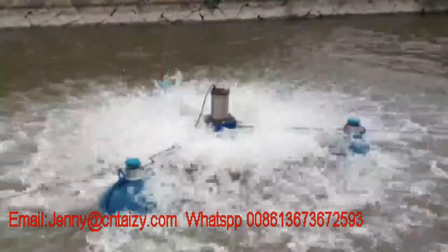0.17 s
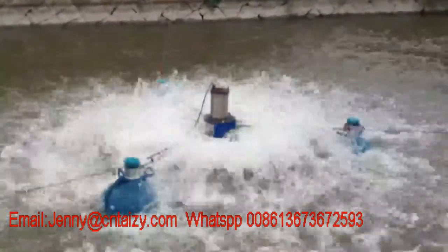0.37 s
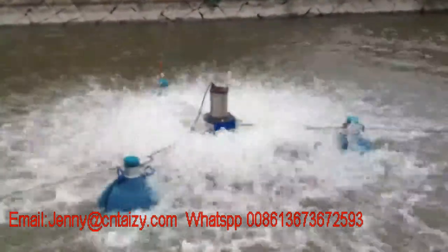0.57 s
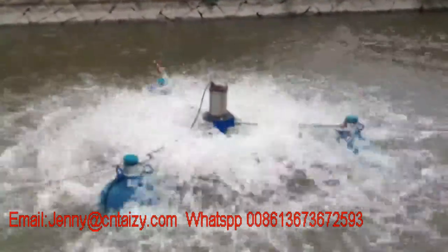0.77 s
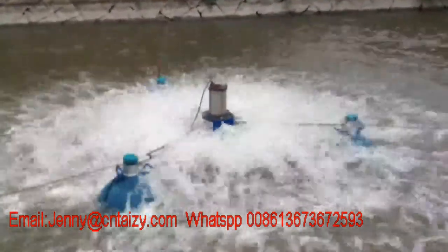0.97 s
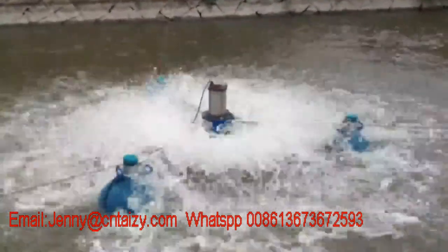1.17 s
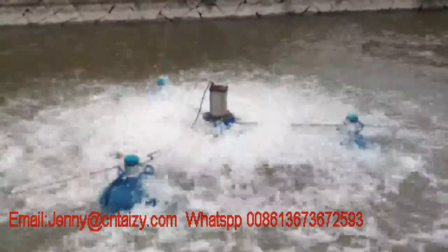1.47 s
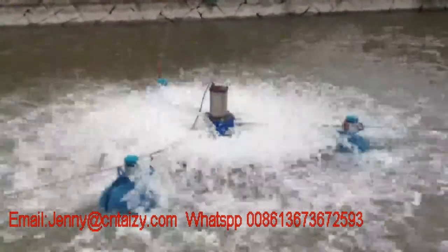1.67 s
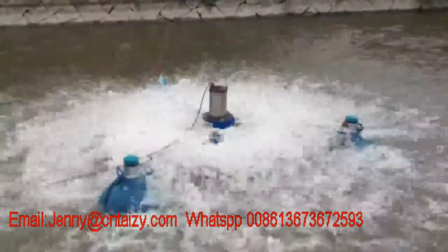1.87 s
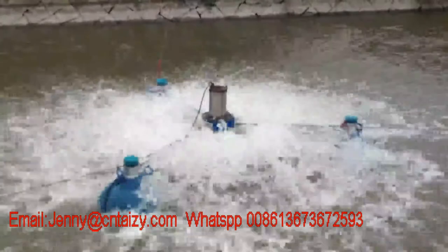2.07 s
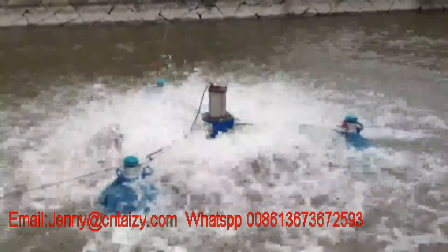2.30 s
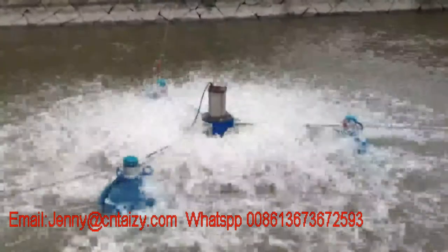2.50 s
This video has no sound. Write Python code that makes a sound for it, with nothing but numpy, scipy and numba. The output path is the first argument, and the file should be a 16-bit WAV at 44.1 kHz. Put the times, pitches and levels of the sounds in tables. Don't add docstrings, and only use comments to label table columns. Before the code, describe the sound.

A floating pond aerator runs throughout, about 2.6 seconds, already at full force. Dense bright spray roars steadily with slight flutter, full of tiny bubbles and quick splashes. Hollow watery gulps pop near 0.2-0.6, 1.3 and 1.9 seconds. A steady-pitched mid-range gearbox whine pulses unevenly several times each second. A distant tool hisses faintly, with thin metallic ringing until 0.6. Outdoor phone pickup, weak bass, abrupt end.

```python
import sys
import numpy as np
from scipy import signal
from scipy.fft import rfft, irfft
from scipy.io import wavfile
from scipy.ndimage import uniform_filter1d
from numba import njit

SR = 44100
rng = np.random.default_rng(int(sys.argv[2]) if len(sys.argv) > 2 else 0)


def convert_level_to_amplitude(level_db):
    exponent = np.asarray(level_db, float) / 20
    return 10 ** exponent


def persist_wave(psi):
    counts = np.round(np.clip(psi, -1, 1) * 32767).astype(np.int16)
    wavfile.write(sys.argv[1], SR, np.atleast_2d(counts).T)


N = 116424

# (frequency [Hz], density [dB per Hz])
SPRAY_COLOUR = [(60, -43), (130, -16), (240, -3.5), (800, -9), (2300, -1), (5600, -6.5), (11200, -20.5),
                (15200, -14.5)]
# (time [s], level [dB])
WHEEL_CHURN = [(0.0, -28), (0.4, -27), (0.41, -26), (0.92, -28.5), (1.01, -27.5), (1.05, -27),
               (1.64, -30.5), (1.65, -25.5), (1.84, -28.5), (2.04, -27.5), (2.12, -34.5), (2.15, -31),
               (2.29, -27), (2.3, -28), (2.37, -27.5), (2.6, -30), (2.64, -31)]
# (time [s], bubble pitch [Hz], level [dB])
SHEET_LANDINGS = [(.04, 1150, -36), (.21, 1283, -35), (0.341, 1174, -34.5), (.42, 2320, -31),
                  (.46, 1130, -40), (0.501, 2300, -31), (.55, 1670, -29.5), (0.661, 3100, -30),
                  (.68, 2280, -37), (0.969, 1760, -37), (1.0, 3200, -44), (1.03, 2300, -35),
                  (1.1, 2424, -30.5), (1.2, 1220, -35), (1.28, 1780, -30), (1.4, 1200, -35.5),
                  (1.56, 1800, -40), (1.62, 1640, -32), (1.651, 2480, -28.5), (1.72, 2350, -31),
                  (1.74, 1290, -37), (1.96, 1710, -32), (2.03, 2500, -29.5), (2.14, 1170, -36),
                  (2.239, 2300, -35), (2.4, 3200, -32), (2.499, 1180, -34.5), (2.56, 2300, -31),
                  (2.6, 1150, -36)]
# (time [s], pitch [Hz], level [dB])
AIR_GULPS = [(0.33, 1300, -21), (0.544, 1175, -21), (.575, 1123, -18), (1.019, 940, -32),
             (1.339, 1130, -22), (1.89, 1120, -18.5), (.375, 598, -30), (1.89, 606, -34), (.78, 296, -33),
             (1.5, 290, -33), (0.18, 1130, -22), (1.28, 1850, -25)]
# (time [s], pitch [Hz])
MESH_PITCH = [(0.0, 560.8), (0.16, 560.1), (0.31, 561.0), (0.47, 560.0), (0.62, 559.7), (0.78, 561.5),
              (0.93, 561.0), (1.09, 560.0), (1.24, 560.0), (1.4, 562.7), (1.55, 560.4), (1.71, 560.2),
              (1.86, 562.9), (2.02, 560.3), (2.17, 560.9), (2.33, 559.4), (2.48, 561.6), (2.64, 558.8)]
# (time [s], level [dB], spread [s])
PADDLE_BITES = [(0.007, -23.5, 0.0071), (0.04, -22, 0.0081), (0.095, -21.7, 0.026), (0.177, -22.5, 0.025),
                (0.235, -21, 0.024), (0.282, -23.5, 0.012), (0.334, -20.5, 0.027), (0.363, -38, 0.025),
                (0.464, -21.5, 0.017), (0.504, -30.7, 0.013), (0.577, -19, 0.023), (0.643, -23, 0.015),
                (0.692, -20.5, 0.017), (0.765, -22.5, 0.037), (0.816, -20, 0.019), (0.861, -20, 0.024),
                (0.933, -23, 0.018), (0.988, -36.0, 0.0057), (1.035, -20.5, 0.02), (1.129, -23.9, 0.031),
                (1.189, -23.5, 0.016), (1.233, -24, 0.012), (1.269, -24.5, 0.011), (1.306, -20, 0.016),
                (1.355, -24, 0.011), (1.394, -25, 0.012), (1.464, -37, 0.041), (1.52, -25.5, 0.014),
                (1.546, -33, 0.012), (1.616, -23.5, 0.036), (1.669, -28, 0.02), (1.716, -28, 0.01),
                (1.776, -18.5, 0.04), (1.843, -23.4, 0.028), (1.913, -31, 0.045), (1.957, -26, 0.0073),
                (2.006, -23.2, 0.02), (2.095, -23, 0.023), (2.145, -23.5, 0.017), (2.186, -29.5, 0.009),
                (2.226, -23, 0.021), (2.272, -28, 0.0078), (2.32, -21.0, 0.029), (2.39, -24.5, 0.0077),
                (2.482, -22.5, 0.025), (2.58, -26.5, 0.029), (2.626, -23.5, 0.018)]
# (time [s], level [dB])
TOOL_LEVEL = [(0, -35), (.1, -33.5), (.2, -34), (.42, -34.5), (.6, -35.5), (.85, -37), (1, -35.5),
              (1.55, -37), (1.65, -35), (2.1, -36.5), (2.3, -35.5), (2.55, -33.5), (2.64, -33.5)]
# (frequency [Hz], level [dB])
BLADE_MODES = [(4619, -51), (4759, -50), (4947, -51), (5120, -47), (5313, -51), (6487, -56), (7510, -50),
               (7634, -48), (7725, -47), (7854, -49), (8000, -46), (8506, -48), (8651, -52), (9421, -50)]
# (frequency [Hz], width [Hz], boost [dB])
HOUSING_MODES = [(496, 155, 7.5), (1320, 330, 2.5), (6460, 520, 4.5), (369, 96, -4.5), (605, 195, 7),
                 (2270, 820, 1.5), (5540, 560, -4), (10700, 3400, -0.5), (3200, 510, -1.45)]
# (frequency [Hz], width [Hz], boost [dB])
TREBLE_SHELF = [(12500, 1100, 3), (13400, 1400, 5), (14250, 700, 4.5), (15050, 800, -6)]


def level(x, rms_db):
    return x * convert_level_to_amplitude(rms_db) / np.sqrt(np.mean(x ** 2))


def band(hz, width_hz):
    f = np.arange(N // 2 + 1) * SR / N + 1e-3
    return 1 / np.sqrt(1 + ((f - hz ** 2 / f) / width_hz) ** 2)


def noise(shape):
    return irfft(rfft(rng.standard_normal(N)) * shape, N)


def walk(rate_hz):
    hold = int(SR / rate_hz)
    steps = np.repeat(rng.standard_normal(N // 64), hold)[:N]
    return 1.3 * uniform_filter1d(uniform_filter1d(steps, hold), hold)


def curve(table):
    return np.interp(np.arange(N) / SR, *np.array(table, float).T)


@njit
def ring(start, hz, size, cycles, glide, n):
    y = np.zeros(n)
    for j in range(len(start)):
        length, phase = int(cycles * SR / hz[j]), 0.
        for i in range(min(length, n - start[j])):
            u = i / length
            phase += 2 * np.pi * hz[j] * (1 + glide * u) / SR
            y[start[j] + i] += size[j] * np.sin(phase) * np.exp(-5 * u) * min(1., 12 * u)
    return y


def spray():
    spray_db, churn_share, slap_db, patch_db, flicker_db = -25.5, 0.54, 0.95, 0.06, 0.55
    surge_db = churn_share * curve(WHEEL_CHURN) + slap_db * walk(21.86)
    octaves = np.log2(np.arange(N // 2 + 1) * SR / N + 1)
    colour_hz, colour_db = np.array(SPRAY_COLOUR, float).T
    colour = convert_level_to_amplitude(np.interp(octaves, np.log2(colour_hz), colour_db))
    patches = [walk(16) for _ in range(10)]
    out = 0
    for k in range(30):
        shape = np.cos(np.pi / 2 * np.clip(3 * (octaves - np.log2(25)) - k, -1, 1))
        band_db = surge_db + patch_db * patches[k // 3] + flicker_db * walk(27.87)
        out = out + noise(colour * shape) * convert_level_to_amplitude(band_db)
    return level(out, spray_db)


def splashes():
    bubbles_per_splash, spread_s, spread_oct = 14, .015, .15
    s, hz, db = np.array(SHEET_LANDINGS, float).T[:, :, None]
    scatter = rng.standard_normal((len(SHEET_LANDINGS), bubbles_per_splash, 3))
    start = np.clip((s + spread_s * scatter[..., 0]) * SR, 0, N - 1).astype(np.int64)
    hz = hz * 2 ** (spread_oct * scatter[..., 1])
    size = convert_level_to_amplitude(db + 6.5 + 2.75 * scatter[..., 2])
    return ring(start.ravel(), hz.ravel(), size.ravel(), 18.5, 0.11, N)


def bubbles():
    bubbles_per_s, bubble_db, centre_hz, spread_oct, scatter_db = 900, -36.5, 2016, 0.79, 2
    when, u, v, w = rng.random((int(bubbles_per_s * N / SR), 4)).T
    spread = np.sqrt(-2 * np.log(1 - u)) * np.cos(2 * np.pi * v)
    hz = np.clip(centre_hz * 2 ** (spread_oct * spread), 300, 12000)
    size = convert_level_to_amplitude(-scatter_db * np.log(1 - .985 * w))
    return level(ring((when * N).astype(np.int64), hz, size, 7.7, 0.13, N), bubble_db)


def gulps():
    s, hz, db = np.array(AIR_GULPS, float).T
    return ring((s * SR).astype(np.int64), hz.copy(), convert_level_to_amplitude(db), 67., 0.024, N)


def gearbox():
    shaft_hz, shaft_throb, shaft_sway_rad, wobble_rad = 48.7, 0.044, 0.078, .3
    octave_db, hum_hz, hum_db = -46, 301, -51
    mesh_hz, rattle_width_hz, rattle_db = 560.6, 110, -40
    t = np.arange(N) / SR
    load = sum(convert_level_to_amplitude(db) * np.exp(-.5 * ((t - s) / max(w, .006)) ** 2) for s, db, w in PADDLE_BITES)
    shaft = 2 * np.pi * shaft_hz * t
    throb = 1 + shaft_throb * np.cos(shaft)
    phase = 2 * np.pi * np.cumsum(curve(MESH_PITCH)) / SR + wobble_rad * walk(17) + 0.13 * walk(29.9)
    tone = np.sqrt(2) * load * throb * np.sin(phase + shaft_sway_rad * np.sin(shaft))
    octave = np.sqrt(load) * convert_level_to_amplitude(3.1 * walk(12)) * np.sin(2 * phase + walk(12))
    hum = convert_level_to_amplitude(3.6 * walk(9)) * np.sin(2 * np.pi * hum_hz * t + 1.55 * walk(12))
    rattle = noise(band(mesh_hz, rattle_width_hz) ** 2)
    return tone + level(octave, octave_db) + level(hum, hum_db) + level(rattle, rattle_db)


def tool():
    hiss_hz, hiss_width_hz, hiss_db, contrast, ref_db = 6470, 6700, -30, 2.13, -33.5
    ring_from_s, ring_to_s, ring_db, mode_width_hz = 0, .62, 3.5, 44
    t = np.arange(N) / SR
    hiss = level(noise(band(hiss_hz, hiss_width_hz) ** 2), hiss_db)
    hiss = hiss * convert_level_to_amplitude(contrast * (curve(TOOL_LEVEL) - ref_db))
    bite = np.sin(np.pi * np.clip((t - ring_from_s) / (ring_to_s - ring_from_s), 0, 1))
    blade = 0
    for hz, db in BLADE_MODES:
        mode = level(noise(band(hz, mode_width_hz) ** 2), db + ring_db)
        blade = blade + convert_level_to_amplitude(3.67 * walk(15)) * mode
    return hiss + bite * blade


def scene():
    housing = convert_level_to_amplitude(sum(db * band(hz, w) ** 2 for hz, w, db in HOUSING_MODES + TREBLE_SHELF))
    noisy = spray() + splashes() + bubbles() + tool()
    coloured = irfft(rfft(noisy) * housing, N)
    return np.tile(coloured + gulps() + gearbox(), (2, 1))


def roll_off(x):
    return signal.sosfilt(signal.butter(12, 15380, fs=SR, output="sos"), x)


def record(dry):
    bass_cut_hz, squeeze, squeeze_s = 102, .3, .08
    dry = signal.sosfilt(signal.butter(2, bass_cut_hz, "high", fs=SR, output="sos"), dry)
    power = uniform_filter1d(dry[0] ** 2, int(squeeze_s * SR))
    mix = dry * (power.mean() / power) ** (squeeze / 2)
    return roll_off(mix)


dry = scene()
out = record(dry)
persist_wave(out)
```